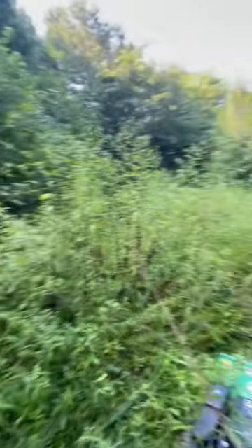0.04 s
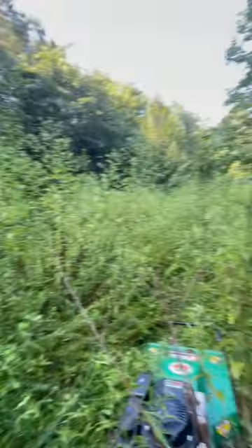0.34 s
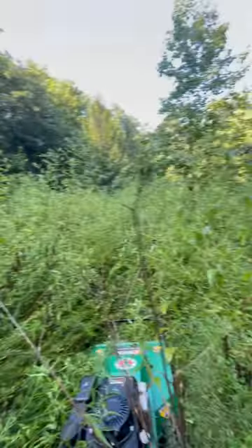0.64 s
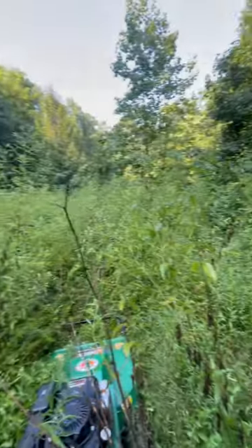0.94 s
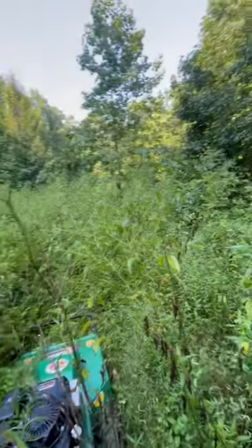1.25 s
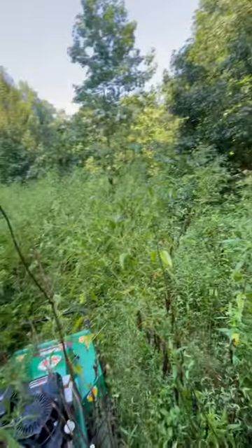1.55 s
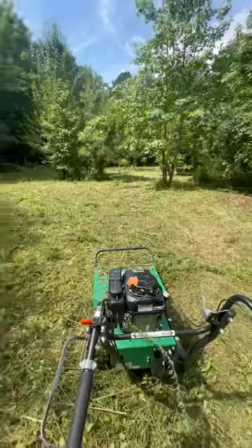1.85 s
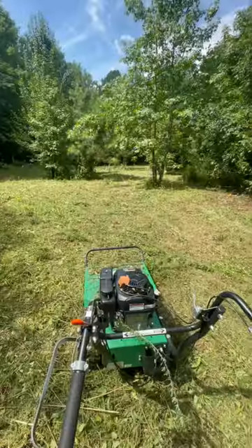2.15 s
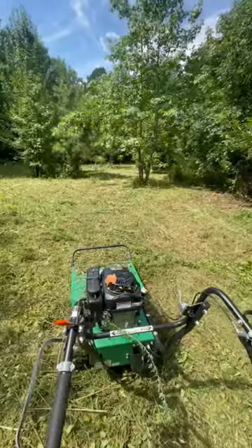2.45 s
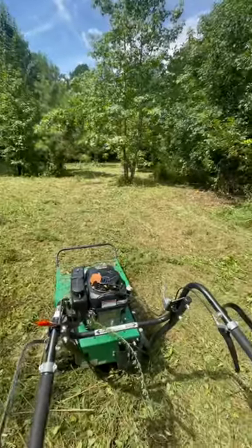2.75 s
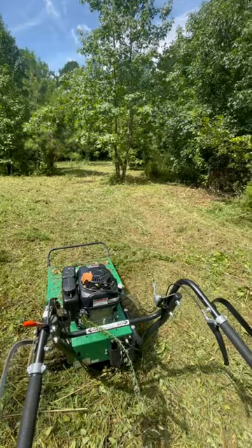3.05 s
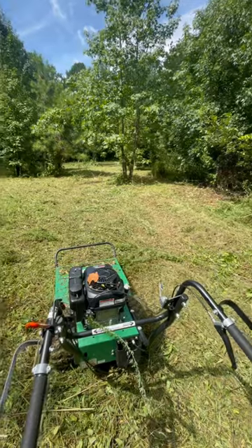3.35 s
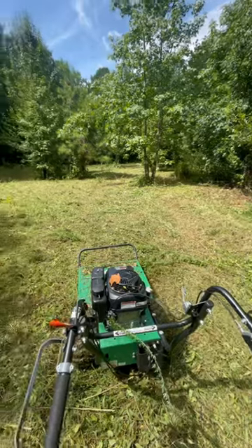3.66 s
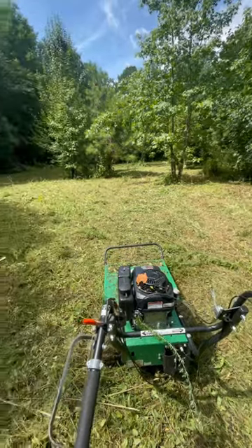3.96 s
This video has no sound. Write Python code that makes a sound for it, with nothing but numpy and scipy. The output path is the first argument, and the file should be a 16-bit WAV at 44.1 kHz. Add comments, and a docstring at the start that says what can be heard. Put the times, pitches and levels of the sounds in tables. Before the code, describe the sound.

A walk-behind mower's petrol engine runs at full throttle, heard close from the handlebars, droning and whining, with a muffler pop near 0.8 seconds. At about 1.6 seconds it breaks off for an instant and resumes slower, popping at 1.8. The blade's rush fades by 3 seconds, leaving quieter engine clatter, ticks, metal rattles, chinks and a couple of faint pops. The rush returns slightly just before 4 seconds.

```python
"""Walk-behind brush mower

A one-cylinder four-stroke engine, heard from the handlebars. It runs at full throttle in tall weeds; after a
brief silence the scene changes, and it runs slower on cleared ground while the blade's rush dies away and loose
parts rattle and chink. Each cycle gives exhaust puffs, clatter and valve ticks. The flywheel fan whines, the
steel deck drones, the muffler pops."""
import sys
import numpy as np
from scipy import signal
from scipy.fft import rfft, irfft
from scipy.io import wavfile

SR = 44100
rng = np.random.default_rng(int(sys.argv[2]) if len(sys.argv) > 2 else 0)


def wav_out(sig):
    """Save sig, one row per channel (or a flat mono array), as 16-bit PCM at SR to the path in sys.argv[1]."""
    wavfile.write(sys.argv[1], SR, np.round(np.clip(np.atleast_2d(sig).T, -1, 1) * 32767).astype(np.int16))


N = 176400
T, HZ = np.arange(N) / SR, np.fft.rfftfreq(N, 1 / SR)

# Exhaust puffs. Each row: place in the cycle (0-1), width in cycles, relative level in dB.
PUFFS = [(0, .055, -1), (.14, 0.066, -4.5), (0.279, 0.064, 0)]
# Valve tick spectrum. Each row: frequency in Hz, density in dB.
VALVE_RING = [(1500, -90), (4500, -82), (8500, -77.5), (10000, -74.5), (11600, -75.5), (13300, -95)]


def amp(db):
    return 10 ** (np.asarray(db) / 20)


def unit_rms(x):
    return x / np.sqrt(np.mean(x ** 2) + 1e-20)


def curve(points):
    """Control curve over time."""
    return np.interp(T, *np.transpose(points))


def spectrum(points, column=1):
    """One table column, read over log frequency."""
    table = np.array(points)
    return np.interp(np.log(HZ + 1), np.log(table[:, 0]), table[:, column])


def wander(hz):
    """Slow random drift, rms 1."""
    return unit_rms(irfft(rfft(rng.standard_normal(N)) * np.exp(-(HZ / hz) ** 2), N))


def engine_cycles(speed, span_s):
    """Engine cycles counted from the first puff."""
    start_s, _, first_puff_s = span_s
    cycles = np.cumsum(curve(speed) * (T >= start_s)) / SR
    return cycles - np.interp(first_puff_s, T, cycles)


def bursts(cycles, table, floor, scatter_db):
    """Envelope of each cycle's bursts: quick rise, slower fall, random strength, over a steady floor."""
    rise_share = .32
    power = floor ** 2
    for place, width, db in table:
        count = cycles - place + 2.5  # offset keeps the index positive
        strength = amp(db + scatter_db * rng.uniform(-1, 1, SR // 100))[count.astype(int)]
        age = (count % 1 - .5) / width
        power = power + strength ** 2 * np.exp(-np.where(age < 0, (age / rise_share) ** 2, age))
    return np.sqrt(power)


def body_noise(colour, envelope):
    """Pulsed stereo noise, coloured by the many small resonances of the engine's body."""
    # Each row: frequency in Hz, left-right coherence (0-1).
    likeness = [(300, .99), (1300, 0.78), (2200, 0.46), (6500, 0.32), (9500, 1), (12000, 1)]
    left, independent = rfft(rng.standard_normal((2, N)) * unit_rms(envelope))
    coherence = np.clip(spectrum(likeness), 0, 1)
    right = coherence * left + np.sqrt(1 - coherence ** 2) * independent
    ripple_db = unit_rms(signal.oaconvolve(rng.standard_normal(len(HZ)), np.hanning(SR // 200), "same"))
    return irfft(np.array([left, right]) * amp(spectrum(colour) + ripple_db), N) * np.sqrt(SR / 2)


def at_microphones(sound, paths, span_s):
    """The pair hears one time span, with phase and level differing between left and right."""
    lead_rad = spectrum(paths)
    tilt = amp(spectrum(paths, column=2) / 2)
    pair = irfft(rfft(sound) * np.array([tilt, np.exp(-1j * lead_rad) / tilt]), N)
    return pair * np.clip(np.minimum(T - span_s[0], span_s[1] - T) / .002, 0, 1)


def exhaust_note(cycles, harmonics, rough, smear):
    """Harmonics of the firing rate, lined up into puffs that the muffler smears over the cycle."""
    place = np.arange(SR // 100) / (SR // 100)
    one_cycle = bursts(place, PUFFS, floor=smear, scatter_db=0) ** 3 * rng.standard_normal(len(place))
    phase_rad = np.angle(rfft(one_cycle))
    angle = 2 * np.pi * (cycles + .001 * wander(hz=25))
    return unit_rms(sum(amp(db) * (1 + rough * wander(hz=16)) * np.cos(k * angle + phase_rad[k])
                        for k, (_, db) in enumerate(harmonics, 1)))


def fan(cycles, whine_db, octave_db, jitter_rad):
    """The flywheel fan whines; the crank speeds up and slows within each cycle."""
    periods_per_cycle = 48
    crank_swing_rad = .23 * np.sin(2 * np.pi * cycles)
    angle = 2 * np.pi * periods_per_cycle * cycles + crank_swing_rad + jitter_rad * wander(hz=30)
    whine = amp(whine_db) * np.cos(angle) + amp(octave_db) * np.cos(2 * angle)
    return whine * (1 + .08 * wander(hz=40))


def deck_drone(hz=208.4, db=-31.5):
    """The steel deck drones unevenly at its own pitch and beats against the exhaust note."""
    swell = 1 + .37 * wander(hz=7)
    return amp(db) * unit_rms(swell * np.cos(2 * np.pi * hz * T + wander(hz=7.6)))


def muffler_pops(crack_hz=329, crack_s=.0017, boom_hz=86, boom_s=.0055, boom_delay_s=.007):
    """A short crack, then a low boom from the muffler."""
    # Each row: start in seconds, crack level in dB, boom level in dB.
    pops = [(0.7731, -7.5, -17), (1.807, -11.5, -19), (2.755, -21, -25.5), (3.409, -19.5, -26)]

    def ring(t, hz, decay_s):
        age = np.maximum(t, 0) / decay_s
        return age * np.exp(1 - age) * np.sin(2 * np.pi * hz * t)
    return sum(amp(crack_db) * ring(T - start_s, crack_hz, crack_s)
               + amp(boom_db) * ring(T - start_s - boom_delay_s, boom_hz, boom_s)
               for start_s, crack_db, boom_db in pops)


def in_weeds():
    """Full throttle: a strong exhaust note, the deck's drone and a clear fan whine."""
    # Start, end and first puff in seconds.
    span_s = (0, 1.571, .019)
    # Each row: time in seconds, firing rate in Hz.
    speed = [(0, 27.6), (.03, 27.92), (.118, 28.08), (.532, 28.1), (.76, 27.88), (.782, 27.5),
             (1.25, 27.62), (1.494, 28.12), (1.57, 27.85)]
    # Exhaust note. Each row: multiple of the firing rate, relative level in dB.
    harmonics = [(1, -29), (2, -2), (3, -7.5), (4, -13), (5, -7.5), (6, -7.5), (7, -9), (8, 0.5), (9, -6),
                 (10, -0.5), (11, -13.5), (12, -11.5), (13, -7.5), (14, -13), (15, -10), (16, -3),
                 (17, -13.5), (18, -13), (19, -11.5), (20, -15), (21, -32), (22, -16), (23, -18.5),
                 (24, -10), (25, -17), (26, -13.5)]
    # Each row: time in seconds, level in dB.
    exhaust_db = [(0, -21.5), (.4, -21), (1.1, -22), (1.57, -22)]
    # Exhaust rasp and clatter spectra. Each row: frequency in Hz, density in dB.
    rasp_colour = [(38, -92), (90, -65), (190, -53), (380, -57), (750, -63), (2500, -95)]
    clatter_colour = [(150, -76), (700, -67.5), (1400, -57.5), (1850, -64), (2350, -60.5), (3150, -63),
                      (3900, -68), (4700, -66.5), (8500, -77), (11300, -75), (13500, -100)]
    # Valve ticks. Each row: place in the cycle (0-1), width in cycles, relative level in dB.
    ticks = [(.27, 0.13, 0.41), (.56, 0.12, 1.5)]
    # Paths to the microphones. Each row: frequency in Hz, left lead in radians, left minus right in dB.
    paths = [(100, 0, .6), (500, .55, 2), (1200, 1.35, 3.8), (2000, 1.4, 0), (2600, -.9, 3), (4000, .4, .5),
             (5000, 6.3, 0), (6000, 6.5, -1), (7800, 8.8, 0), (9700, 9.4, 0), (11800, 12.57, 0)]
    cycles = engine_cycles(speed, span_s)
    tones = amp(curve(exhaust_db)) * exhaust_note(cycles, harmonics, rough=.085, smear=.3)
    tones += fan(cycles, whine_db=-24, octave_db=-67, jitter_rad=.2) + deck_drone()
    rasp = body_noise(rasp_colour, bursts(cycles, PUFFS, floor=.42, scatter_db=2.5))
    clatter = body_noise(clatter_colour, bursts(cycles, PUFFS, floor=1.4, scatter_db=7.5))
    valves = amp(-1) * body_noise(VALVE_RING, bursts(cycles, ticks, floor=.4, scatter_db=6.5))
    return at_microphones(tones + rasp + clatter + valves + muffler_pops(), paths, span_s)


def blade_rush(cycles):
    """The blade's rush pulses with the engine, dies away and returns a little at the end."""
    # Each row: frequency in Hz, density in dB before the gain.
    colour = [(40, -90), (110, -67), (220, -59), (780, -56.5), (1300, -64.5), (2200, -67), (9000, -82)]
    # Each row: time in seconds, gain in dB.
    gain_db = [(1.6, -1), (1.8, 1), (2, -2.5), (2.25, -5), (2.7, -7.5), (3.15, -20), (3.85, -11.5)]
    return amp(curve(gain_db)) * body_noise(colour, bursts(cycles, PUFFS, floor=.42, scatter_db=0))


def rattle(taps_per_s=150):
    """Loose metal parts are tapped at random and ring briefly."""
    # Each row: frequency in Hz, rms level in dB, decay in seconds.
    modes = [(1421, -41.5, 0.011), (1605, -52, 0.0079), (1848, -44, 0.011), (1898, -44.5, 0.029),
             (2720, -37, 0.0091)]
    t, out = T[:SR // 10], 0
    for hz, db, decay_s in modes:
        taps = rng.standard_normal(N) * (rng.random(N) < taps_per_s / SR)
        ring = np.exp(-t / decay_s) * np.sin(2 * np.pi * hz * t)
        out = out + amp(db) * unit_rms(signal.oaconvolve(taps, ring)[:N])
    return out


def chinks(hz=4440, db=-45, decay_s=.012, per_s=10.3):
    """A loose part chinks at a steady beat."""
    age_s = (per_s * T) % 1 / per_s
    ring = (1 + .5 * wander(hz=100)) * np.sin(2 * np.pi * hz * age_s + wander(hz=100))
    return amp(db) * unit_rms(np.exp(-age_s / decay_s) * ring)


def on_cleared_ground():
    """Lower speed: the blade's rush fades and leaves clatter, rattle and valve ticks."""
    # Start, end and first puff in seconds.
    span_s = (1.602, 4, 1.6395)
    # Each row: time in seconds, firing rate in Hz.
    speed = [(1.8, 24.3), (1.9, 24.02), (2.22, 24.15), (2.47, 24.48), (3.15, 24.44), (3.5, 24.18),
             (4, 24.36)]
    # Exhaust note. Each row: multiple of the firing rate, relative level in dB.
    harmonics = [(1, -36), (2, -7), (3, -4), (4, -7.5), (5, -1), (6, -2), (7, -8.5), (8, 1), (9, -7.5),
                 (10, -4.5), (11, -4), (12, -3), (13, -8.5), (14, -17), (15, -10), (16, -5), (17, -10),
                 (18, -10.5), (19, -5), (20, -2)]
    # Each row: time in seconds, level in dB.
    exhaust_db = [(1.8, -22.5), (2.15, -33), (3.1, -34.5), (4, -33.5)]
    # Exhaust rasp and clatter spectra. Each row: frequency in Hz, density in dB.
    rasp_colour = [(40, -99), (100, -79), (210, -64), (330, -67), (2500, -88)]
    clatter_colour = [(150, -81), (970, -66), (1120, -71.5), (1420, -62.5), (2200, -65), (2850, -64.5),
                      (3600, -71.5), (6400, -70.5), (8500, -78), (11300, -72.5), (13500, -108)]
    # Valve ticks. Each row: place in the cycle (0-1), width in cycles, relative level in dB.
    ticks = [(.25, .04, -11), (.32, 0.11, -7), (.55, .06, -4), (.645, 0.074, -4)]
    # Paths to the microphones. Each row: frequency in Hz, left lead in radians, left minus right in dB.
    paths = [(100, 0, .6), (650, .25, 1.3), (1200, 0, 6), (1900, .2, -2), (2650, 3.1, 0), (3400, 7.2, -3.5),
             (4300, 7.4, -2), (5300, 12.1, -2), (8200, 15.6, 0), (9700, 15.7, 0), (11800, 18.85, 0)]
    cycles = engine_cycles(speed, span_s)
    tones = amp(curve(exhaust_db)) * exhaust_note(cycles, harmonics, rough=.054, smear=.71)
    tones += fan(cycles, whine_db=-45, octave_db=-39, jitter_rad=.31) + deck_drone(db=-45)
    rasp = body_noise(rasp_colour, bursts(cycles, PUFFS, floor=.49, scatter_db=0))
    clatter = body_noise(clatter_colour, bursts(cycles, PUFFS, floor=1.1, scatter_db=4))
    valves = body_noise(VALVE_RING, bursts(cycles, ticks, floor=.13, scatter_db=6))
    mower = tones + rasp + clatter + valves + muffler_pops() + blade_rush(cycles) + rattle() + chinks()
    return at_microphones(mower, paths, span_s)


def scene():
    return in_weeds() + on_cleared_ground()


def record(dry):
    """Steep low-pass band limit."""
    edge_hz = 13700
    lowpass = signal.firwin(511, edge_hz, window=("kaiser", 9), fs=SR)
    return signal.oaconvolve(dry, lowpass[None], "same")


dry = scene()
out = record(dry)
wav_out(out)
```